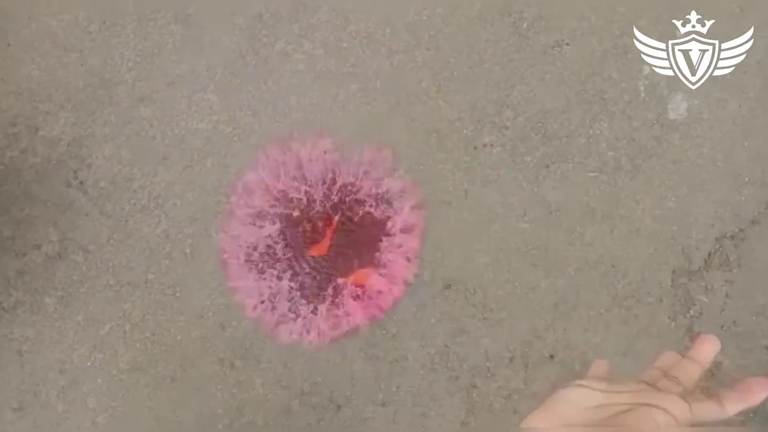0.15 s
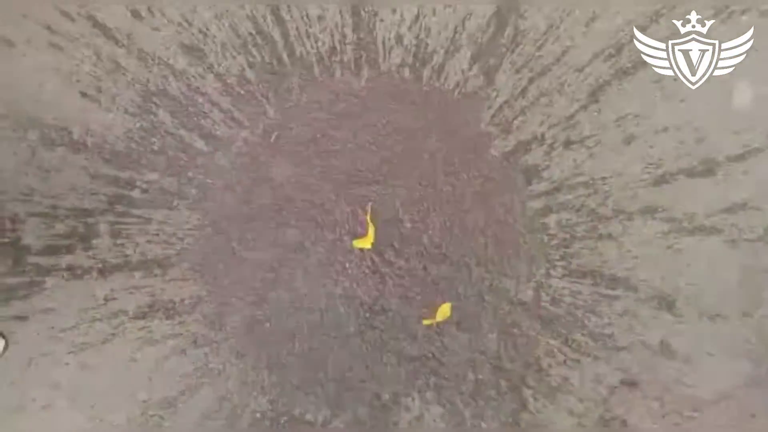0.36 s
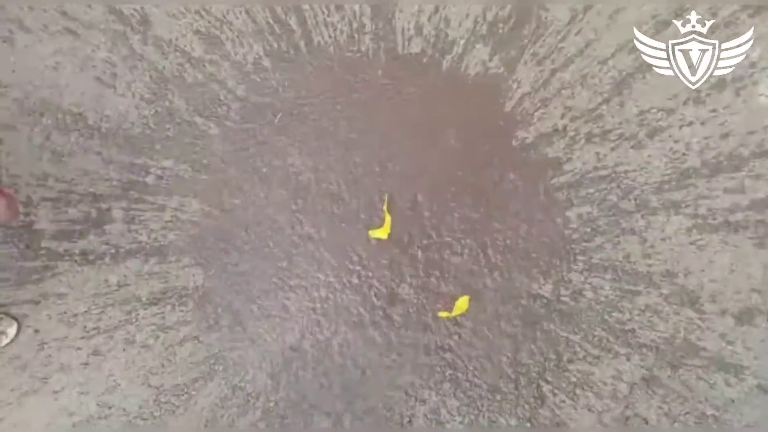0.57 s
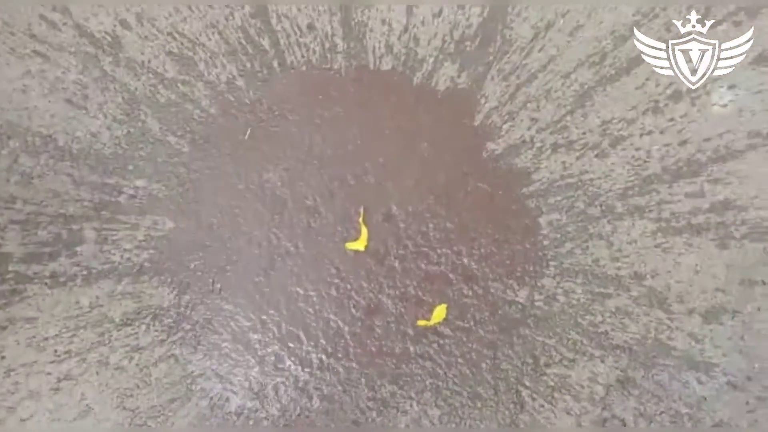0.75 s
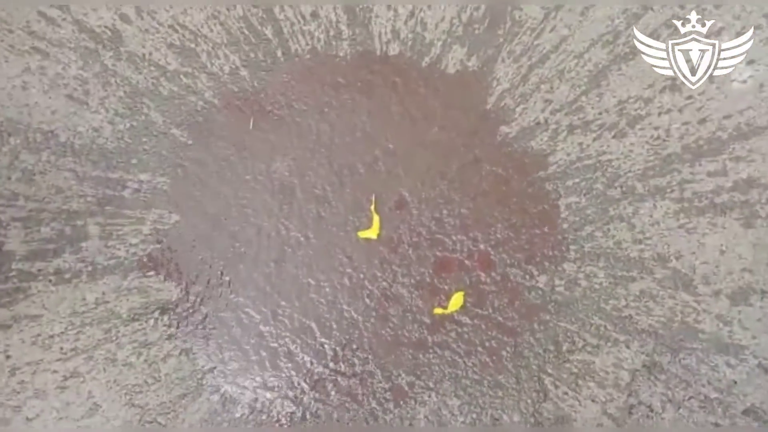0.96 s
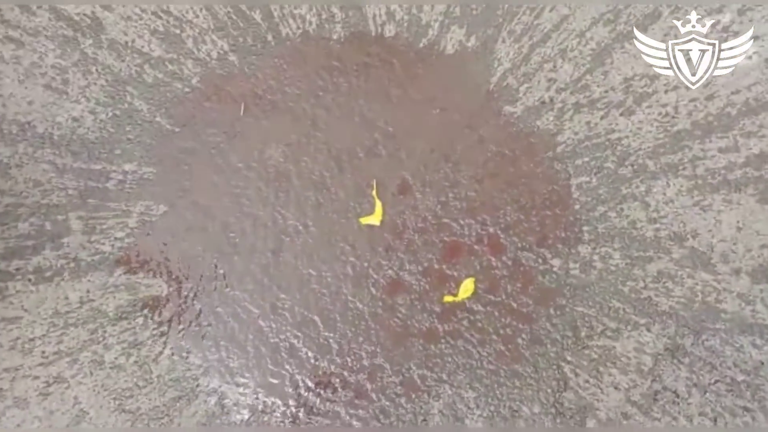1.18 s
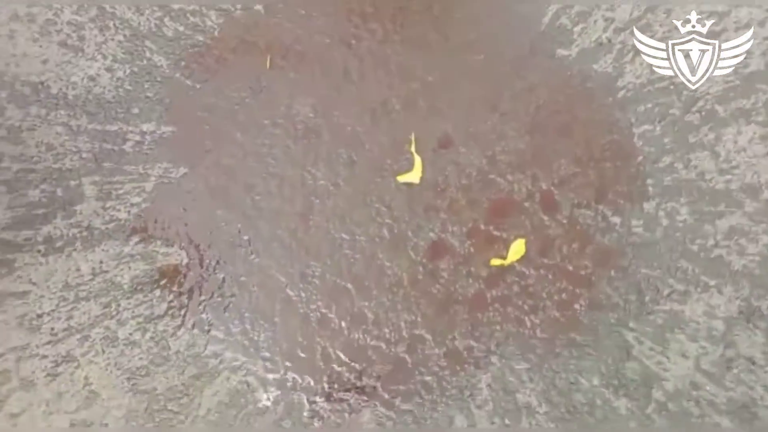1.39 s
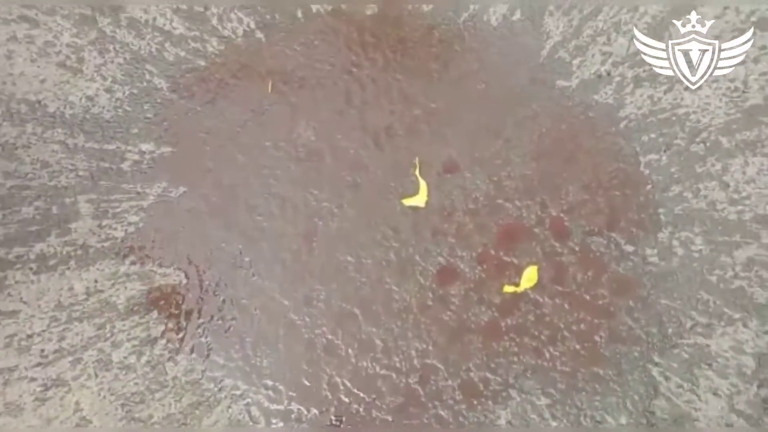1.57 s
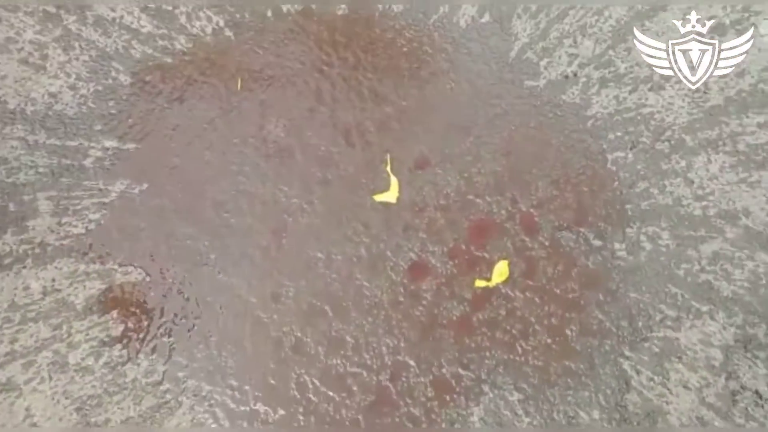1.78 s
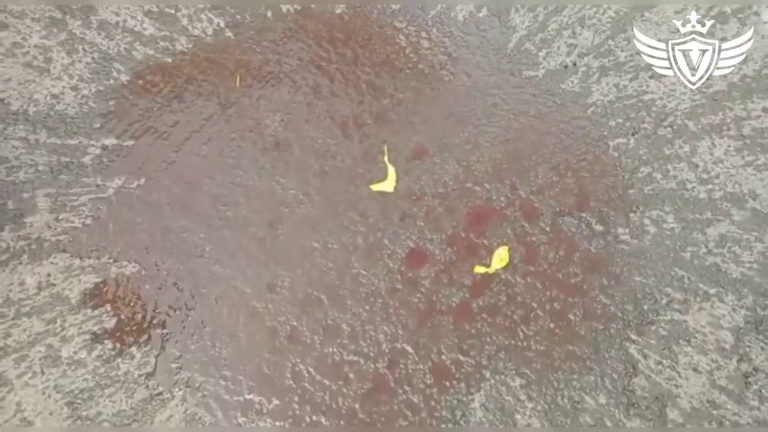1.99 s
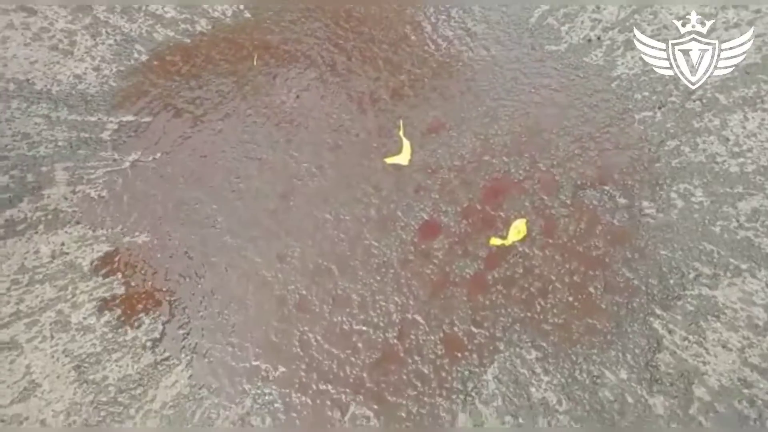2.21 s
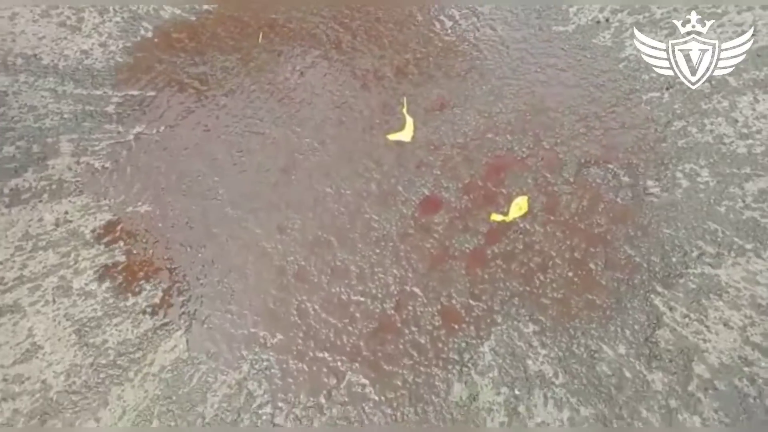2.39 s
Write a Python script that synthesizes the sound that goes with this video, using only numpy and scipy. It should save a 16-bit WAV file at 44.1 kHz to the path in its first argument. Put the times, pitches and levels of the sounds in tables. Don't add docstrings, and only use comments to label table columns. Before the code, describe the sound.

A water balloon bursts on concrete outdoors, close to a small microphone: sharp ragged crack, dense bright spray and water slaps, brief bubbling, then sparse droplets over faint hiss, rumble and soft handling knocks.

```python
import sys
import numpy as np
from scipy import signal
from scipy.fft import rfft, irfft
from scipy.io import wavfile
from scipy.ndimage import map_coordinates

SR = 44100
rng = np.random.default_rng(int(sys.argv[2]) if len(sys.argv) > 2 else 0)


def undo_db(level):
    steps = np.asarray(level, float) / 20
    return 10 ** steps


def to_wav(s):
    ch = np.atleast_2d(s).T
    pcm = np.round(np.clip(ch, -1, 1) * 32767)
    wavfile.write(sys.argv[1], SR, pcm.astype(np.int16))


N = 108045

# t/s, peak level/dB
CRACKS = [(0.2379, -6.5), (0.2389, -5.5), (0.248, -3), (0.2494, 0.5), (0.2505, -6), (0.2532, -1.5),
          (0.255, 0), (0.2564, -11.5), (0.2578, -16), (0.2595, -10), (.2614, -14), (.2632, -16)]
# f/Hz, level/dB
CRACK_TONE = [(400, -35), (1060, -16.5), (2200, -9.5), (2900, 2), (4100, -5.5), (6020, -28.5), (9440, -21),
              (14000, -30.5)]
# t/s, peak level/dB, ring f/Hz
SLAPS = [(0.266, -12, 2850), (0.2699, -12, 2940), (0.2781, -14, 3040), (0.2806, -16, 3050),
         (0.2832, -12.5, 2750), (0.2904, -12, 2760), (0.2948, -14.5, 2750), (0.298, -20, 2790),
         (0.3004, -20.5, 2750), (0.307, -16, 2920), (0.3121, -17, 3200), (0.3141, -19, 2800),
         (0.3178, -20, 2890), (0.3208, -14, 2840), (0.326, -25, 3180), (0.3287, -25, 3340),
         (0.333, -22, 2690), (0.336, -25, 3570), (0.3393, -21, 2730), (0.3415, -23, 2970),
         (0.3449, -27, 2990), (0.3482, -22, 2820), (0.3534, -25, 2940), (0.3584, -19.5, 2900),
         (0.3616, -25, 2810), (0.3649, -22, 3020), (0.3756, -30, 3140), (0.3786, -30, 2600),
         (0.3822, -30, 3010), (0.3855, -27, 3030), (0.39, -34, 3100), (0.399, -31, 2980),
         (0.4013, -34, 2980), (0.4066, -30, 2960), (0.4138, -32, 3150), (0.4195, -37, 3270),
         (0.4234, -34, 2990), (0.4466, -29, 3050), (0.4619, -34, 3110), (0.4813, -29, 3300),
         (0.5106, -35, 2880), (0.5304, -30, 3240), (0.5446, -36, 2990), (0.5515, -37, 2750),
         (0.5765, -35, 3220), (0.606, -36, 2900), (0.6134, -39, 2850), (0.6284, -44, 2980),
         (0.6358, -41, 2820), (0.647, -41.5, 3010), (0.6606, -38, 3150), (0.6646, -37, 2470),
         (0.6675, -37, 3720), (0.6749, -41, 3230), (0.6782, -41, 3190), (0.6817, -42, 3030),
         (0.7029, -40, 2920), (0.7185, -44, 3010), (0.73, -37, 3210), (0.7334, -42, 3200)]
# t/s, level/dB
FLOW = [
    (.238, -25),
    (0.244, -26),
    (0.256, -19),
    (.266, -25.5),
    (0.363, -36.5),
    (0.384, -41.5),
    (.55, -48.5),
    (.74, -58),
    (0.899, -62.5),
]
# f/Hz, level/dB
SPRAY_TONE = [(1200, -27.5), (2200, -4.5), (3000, 0.5), (4000, -4.5), (6300, -29), (9280, -20.5),
              (11000, -29), (15000, -28)]
# f/Hz, level/dB
MIST_TONE = [(1400, -39.5), (2300, -2.5), (3000, 1), (4100, -6), (6300, -17), (9300, -11), (11000, -16),
             (15500, -28)]
# f/Hz, level/dB
SPLAT_TONE = [(900, -37), (1600, -6), (3000, -4), (4300, -2), (6300, -10), (9300, -5), (15000, -21)]
# f/Hz, level/dB
PORT = [(8200, 0), (8800, 3.5), (9350, 6.5), (10000, 3), (10600, 0.5)]
# t/s, level/dB, f/Hz, T60/s
PLOPS = [(0.2384, -24, 580, 0.01), (.2497, -26.5, 425, 0.021), (0.246, -31.5, 278, 0.034),
         (0.25, -27.5, 560, 0.024), (.252, -21.5, 833, 0.028), (.2515, -20.5, 1092, 0.039),
         (.272, -31.5, 850, .04), (.283, -28, 798, 0.026), (.338, -47, 1050, 0.042),
         (.351, -42, 770, 0.042), (.363, -43.5, 890, 0.03)]
# f/Hz, level/dB
GUSH_TONE = [(400, -51), (680, -14), (780, -3), (1250, 2), (1600, -7.5), (3000, -29)]
# t/s, ring level/dB, ring f/Hz, splat level/dB,
# splat T60/s
DROPS = [(.428, -32, 3230, -30, .015), (1.197, -41, 3100, -45, 0.089), (0.456, -42, 5530, -38, .006),
         (0.476, -28, 2530, -47, 0.023), (.488, -26, 3030, -45, 0.018), (.494, -28, 3250, -49, .01),
         (0.506, -30, 2980, -44, .01), (.5175, -25, 4350, -44, 0.022), (.526, -33, 3200, -31.5, .04),
         (0.5471, -29, 2470, -30, 0.013), (0.5725, -35, 2800, -38, 0.024), (.5868, -27.5, 3360, -41, 0.025),
         (0.607, -42, 4150, -46, .008), (0.618, -37, 3300, -42, 0.0088), (.663, -37, 1850, -40, 0.07),
         (.6655, -43, 9000, -42, .006), (.682, -43, 8100, -44, 0.0057), (0.7066, -33, 8950, -48, 0.0045),
         (.714, -35, 2490, -38, 0.019), (0.7331, -48, 12000, -36, 0.0059), (0.801, -52.5, 2995, -43, .02),
         (0.8548, -36.5, 8800, -57, 0.0055), (0.872, -53, 11510, -45, .004),
         (1.539, -39, 2670, -41.5, 0.035), (1.541, -45, 3800, -57, .03), (1.6685, -48, 1790, -64, 0.017),
         (.804, -49, 8560, -52, .005), (2.27, -41.5, 9530, -44, 0.0032)]
# t/s, peak level/dB, wobble f/Hz, T60/s, push over wobble/dB
BUMPS = [
    (0, -37.5, 92, 0.15, -16),
    (0.211, -39.5, 75, 0.065, -24),
    (.508, -41.5, 95.4, 0.072, -13),
    (.615, -49.5, 243, 0.048, -10),
    (1.164, -50, 350, 0.01, 6),
    (1.197, -46, 400, 0.0052, 3.5),
    (1.229, -52, 199, 0.035, -8),
    (1.392, -46.5, 137, 0.06, -2),
    (1.6682, -43, 151, 0.081, 9),
    (1.813, -39.5, 136, 0.027, 0.5),
]
# t/s, length/s, level/dB
CHIRPS = [
    (0.817, 0.12, -67.5),
    (1.278, 0.13, -67.5),
    (1.87, 0.213, -68.5),
    (2.393, .1, -68),
]
# f/Hz, level/dB
AIR_EARLY_TONE = [(530, -54), (900, -13), (1250, -6.5), (1340, -11), (1620, -4.5), (3820, 0), (7060, -26),
                  (9200, -5.5), (16000, -58)]
# f/Hz, level/dB
AIR_LATE_TONE = [(530, -48), (900, -8.5), (1590, -10), (2140, -0.5), (3820, -1.5), (6030, -27.5),
                 (8050, -14.5), (14500, -46.5), (16000, -28)]
# t/s, level/dB
AIR_FLOW = [(0.95, -55.5), (1.33, -55.5), (1.794, -54), (2.45, -55.5)]
# f/Hz, level/dB
RUMBLE_TONE = [(20, -33), (45, -9.5), (90, -1), (160, -4), (300, -10), (600, -10), (900, -16), (1500, -33)]
# t/s, level/dB
GUSTS = [(0.0, -58), (0.12, -54), (0.27, -58.5), (0.53, -59), (0.72, -56.5), (1.08, -57), (1.67, -58.5),
         (1.97, -58), (2.45, -59.5)]

CRACK_DB, CRACK_T60_S, CRACK_PUSH_S = -1.5, 0.003, 0.00003
SLAP_DB, SLAP_RISE_S, SLAP_FALL_S, SLAP_TICK_DB = -2.5, 0.0004, 0.0006, -25
SLAP_SIDE_RATIO, SLAP_SIDE_DB = 0.25, -5
GRAIN_RATE_HZ, GRAIN_SPREAD_DB, HISS_SHARE = 7000, 2.5, 0.7
GRAIN_LOW_HZ, GRAIN_STEP_RATIO, GRAIN_CYCLES = 1680, 1.32, 1.26
MIST_FROM_S, MIST_FADE_S = 0.33, 0.13
THIN_FROM_S, THIN_TO_S, THIN_LEFT = 0.4, 0.55, 0.12
GUSH_FROM_S, GUSH_END_S, GUSH_DB, GUSH_FALL_DB_PER_S = 0.249, 0.4, -38, 151
GUSH_HZ, GUSH_RISE_HZ_PER_S, GUSH_SPREAD, GUSH_CYCLES = 904, 710, 0.202, 5.6
DROP_CYCLES, DROP_HOLD_S, SPLAT_RISE, BRIGHT_UNDER_S = 15.7, 0.001, 0.049, 0.012
YARD_T60_S, YARD_DB = 0.067, -8
BUMP_WIDE_S = 0.00032
SQUEAK_S, SQUEAK_LEN_S, SQUEAK_HZ, SQUEAK_DB, SQUEAK_OVER_DB = 0.154, 0.024, 7550, -64, -3
CRICKET_HZ, CRICKET_WIDE_HZ, CRICKET_RATE_HZ = 5240, 400, 36
AIR_START_DB, AIR_SWELL_DB, RUMBLE_DB = -55.5, 0.8, 1.5
TURN_FROM_S, TURN_TO_S = 0.31, 1.88
DUCK_S, DUCK_DB, DUCK_BACK_S = 0.21, -3.5, 0.14
TOP_HZ, TOP_LOSS_DB = 15450, 26


def unit(x):
    return x / np.sqrt(np.mean(x ** 2) + 1e-20)


def coloured(x, points):
    f, db = np.transpose(points)
    m = 4096
    bins_hz = np.fft.rfftfreq(m, 1 / SR)
    curve_db = np.interp(np.log(bins_hz + 1), np.log(f + 1), np.maximum(db, -70))
    cepstrum = irfft(np.log(undo_db(curve_db)), m)
    cepstrum[1:m // 2] *= 2
    cepstrum[m // 2 + 1:] = 0
    h = irfft(np.exp(rfft(cepstrum)), m)
    return signal.fftconvolve(x, h / np.linalg.norm(h))[:N]


def wobble(rate_hz):
    return map_coordinates(rng.standard_normal(N // 100), [np.arange(N) * rate_hz / SR])


def ramp(from_s, to_s):
    return np.clip((np.arange(N) / SR - from_s) / (to_s - from_s), 0, 1)


def add(out, s, x):
    part = out[max(round(s * SR), 0):][:len(x)]
    part += x[:len(part)]


def ring(hz, t60_s, rise=0., phase=0.):
    t = np.arange(SR // 10) / SR
    return undo_db(-60 * t / t60_s) * np.sin(2 * np.pi * hz * (t + rise * t * t / t60_s) + phase)


def cracks():
    out, t = np.zeros(N), np.arange(400) / SR
    push = 8 * t / CRACK_PUSH_S * np.exp(-t / CRACK_PUSH_S) / (CRACK_PUSH_S * SR * np.e)
    for s, db in CRACKS:
        wake = 0.59 * rng.standard_normal(len(t)) * undo_db(-60 * t / CRACK_T60_S)
        add(out, s, undo_db(db + CRACK_DB) * (push + wake))
    return coloured(out, CRACK_TONE)


def slaps():
    out, ticks, t = np.zeros(N), np.zeros(N), np.arange(-100, 300) / SR
    shape = np.where(t < 0, np.exp(-.5 * (t / SLAP_RISE_S) ** 2), np.exp(-t / SLAP_FALL_S))
    for s, db, hz in SLAPS:
        z = rng.standard_normal(len(t))
        side_hz = hz * (1 + SLAP_SIDE_RATIO * np.sign(z[1]))
        main = np.sin(2 * np.pi * hz * t + np.pi * z[0])
        side = undo_db(SLAP_SIDE_DB) * np.sin(2 * np.pi * side_hz * t + np.pi * z[2])
        add(out, s + t[0], undo_db(db + SLAP_DB) * shape * (main + side))
        add(ticks, s + t[0], undo_db(db + SLAP_TICK_DB) * shape ** 2 * z)
    return out + coloured(ticks, SPLAT_TONE)


def spray(sizes=8):
    s, db = np.transpose(FLOW)
    level = undo_db(np.interp(np.arange(N) / SR, s, db) + 1.7 * wobble(130.1))
    level = level * ramp(.2385, .2395) * (1 - ramp(0.94, 1.14))
    left = 1 - (1 - THIN_LEFT) * ramp(THIN_FROM_S, THIN_TO_S)
    grains = 0
    for k in range(sizes):
        chance, size, sign = rng.random((3, N))
        hz = GRAIN_LOW_HZ * GRAIN_STEP_RATIO ** k
        hits = (chance < left * GRAIN_RATE_HZ / sizes / SR) / np.sqrt(left)
        hits = hits * undo_db(-GRAIN_SPREAD_DB * np.log(size + 0.014)) * np.sign(sign - .5)
        rung = signal.fftconvolve(hits, ring(hz, 3 * GRAIN_CYCLES / hz)[:400])[:N]
        grains = grains + hz ** 0.26 * unit(rung)
    hiss = rng.standard_normal(N)
    drive = level * (np.sqrt(1 - HISS_SHARE) * unit(grains) + np.sqrt(HISS_SHARE) * hiss)
    fine = ramp(MIST_FROM_S, MIST_FROM_S + MIST_FADE_S)
    coarse_part = coloured(drive * np.sqrt(1 - fine), SPRAY_TONE)
    return coarse_part + coloured(drive * np.sqrt(fine), MIST_TONE)


def gush(count=90):
    small, big = np.zeros(N), np.zeros(N)
    for _ in range(count):
        u = rng.random()
        pitch, loud = rng.standard_normal(2)
        late_s = u * (GUSH_END_S - GUSH_FROM_S)
        hz = (GUSH_HZ + GUSH_RISE_HZ_PER_S * late_s) * np.exp(GUSH_SPREAD * pitch)
        db = GUSH_DB - GUSH_FALL_DB_PER_S * late_s - 7.7 * u ** 4 + 3.2 * loud
        add(small, GUSH_FROM_S + late_s, undo_db(db) * ring(hz, 7 * GUSH_CYCLES / hz, 0.12))
    for s, db, hz, t60_s in PLOPS:
        onset = ramp(0, 0.5 / hz)[:SR // 10]
        add(big, s, undo_db(db) * ring(hz, t60_s, 0.12) * onset)
    return big + undo_db(-12.5) * coloured(small, GUSH_TONE)


def drops():
    out, t = np.zeros(N), np.arange(SR // 10) / SR
    near, bright, far = np.zeros((3, N))
    for s, db, hz, splat_db, t60_s in DROPS:
        onset = (1 - np.exp(-t * hz)) ** 3
        add(out, s, 2.16 * undo_db(db) * ring(hz, DROP_CYCLES / hz + DROP_HOLD_S, 0.045) * onset)
        splat = undo_db(splat_db - 60 * t / t60_s) * rng.standard_normal(len(t))
        splat = splat * (1 - np.exp(-t / (t60_s * SPLAT_RISE)))
        target = bright if t60_s < BRIGHT_UNDER_S else far if s > 1 else near
        add(target, s, splat)
    return out + coloured(near, MIST_TONE) + coloured(bright, SPLAT_TONE) + coloured(far, SPRAY_TONE)


def yard(x):
    t = np.arange(SR // 5) / SR
    tail = rng.standard_normal(len(t)) * undo_db(-60 * t / YARD_T60_S) * (t > .003)
    return x + undo_db(YARD_DB) * signal.fftconvolve(x, tail / np.linalg.norm(tail))[:N]


def bumps():
    out, t, w = np.zeros(N), np.arange(SR // 10) / SR, BUMP_WIDE_S
    push = np.exp(-.5 * ((t - 4.2 * w) / w) ** 2)
    push = push - 0.75 * np.exp(-.5 * ((t - 2.0 * w) / (.5 * w)) ** 2)
    for s, db, hz, t60_s, push_db in BUMPS:
        phase = np.pi / 2 * (s == 0)
        add(out, s + (s > 0) * 5.4 * w, undo_db(db) * ring(hz, t60_s, -0.14, phase))
        add(out, s, -undo_db(db + push_db) * push)
    return coloured(out, [(20, -35), (60, -1), (100, 0.5), (16000, -2)])


def squeak():
    shape = ramp(SQUEAK_S, SQUEAK_S + 0.0026) * (1 - ramp(SQUEAK_S + .004, SQUEAK_S + SQUEAK_LEN_S))
    turn = 2 * np.pi * SQUEAK_HZ * np.arange(N) / SR
    return undo_db(SQUEAK_DB) * shape * (np.sin(turn) + undo_db(SQUEAK_OVER_DB) * np.sin(2.02 * turn))


def cricket():
    t, gate = np.arange(N) / SR, np.zeros(N)
    for s, length_s, db in CHIRPS:
        gate += undo_db(db) * np.sin(np.pi * ramp(s - .015, s + length_s + .015)) ** 0.61
    f, w = CRICKET_HZ, CRICKET_WIDE_HZ
    band = [(f - w, -40), (f - w / 2, 0), (f + w / 2, 0), (f + w, -40)]
    strokes = 0.43 + 1.14 * np.sin(np.pi * CRICKET_RATE_HZ * t + .4 * wobble(7.7)) ** 2
    return gate * coloured(rng.standard_normal(N), band) * strokes


def air():
    t, (s, db) = np.arange(N) / SR, np.transpose(AIR_FLOW)
    hiss_db = np.interp(t, np.r_[0, s], np.r_[AIR_START_DB, db])
    hiss_db = hiss_db + AIR_SWELL_DB * wobble(7.09) + 0.71 * wobble(40.43)
    z, turn = rng.standard_normal((3, N)), ramp(TURN_FROM_S, TURN_TO_S)
    hiss = np.sqrt(1 - turn) * coloured(z[0], AIR_EARLY_TONE) + np.sqrt(turn) * coloured(z[1], AIR_LATE_TONE)
    rumble_db = np.interp(t, *np.transpose(GUSTS)) + RUMBLE_DB + 0.44 * wobble(14.44)
    rumble = undo_db(rumble_db) * coloured(z[2], RUMBLE_TONE)
    recovery = ramp(DUCK_S + DUCK_BACK_S, DUCK_S + 2 * DUCK_BACK_S)
    duck = undo_db(DUCK_DB * (t > DUCK_S) * (1 - recovery))
    return duck * (undo_db(hiss_db) * hiss + rumble)


def scene():
    water = coloured(yard(cracks() + slaps()) + spray(), PORT)
    bubbles = yard(gush() + drops())
    mix = undo_db(2.0) * water + bubbles + bumps() + squeak() + cricket() + air()
    return mix[None]


def top_cut(x):
    return signal.sosfilt(signal.butter(12, 16510, fs=SR, output="sos"), x)


def record(dry):
    sos = signal.ellip(6, .5, TOP_LOSS_DB, TOP_HZ, fs=SR, output="sos")
    mix = signal.sosfilt(sos, dry)
    return top_cut(mix)


dry = scene()
out = record(dry)
to_wav(out)
```